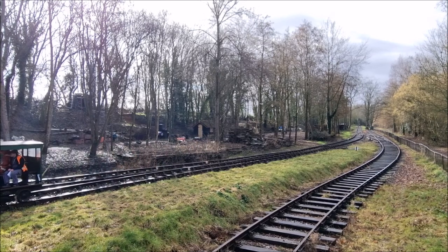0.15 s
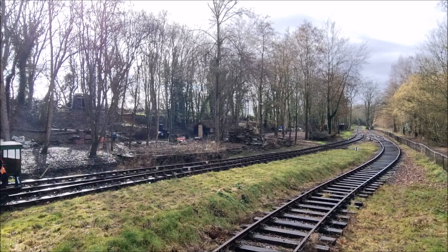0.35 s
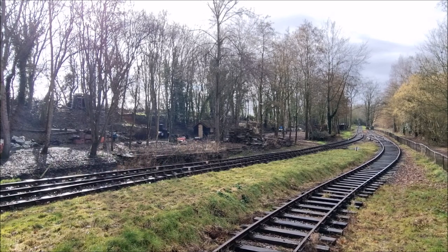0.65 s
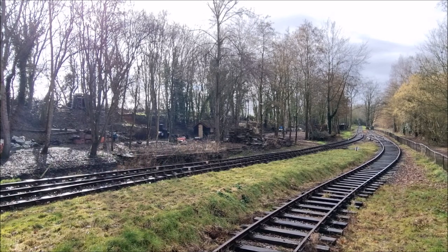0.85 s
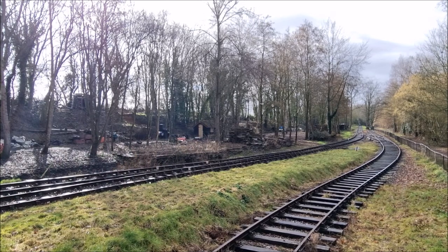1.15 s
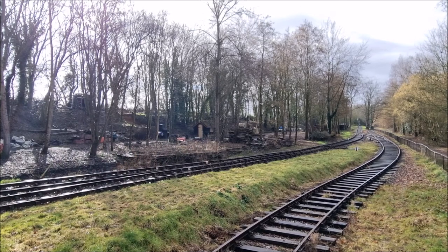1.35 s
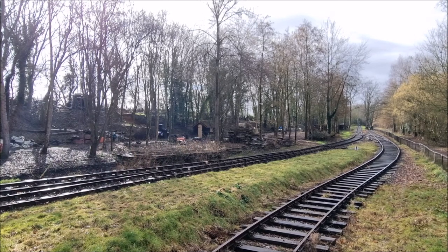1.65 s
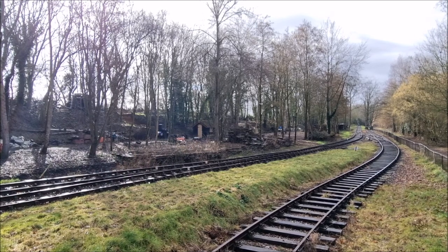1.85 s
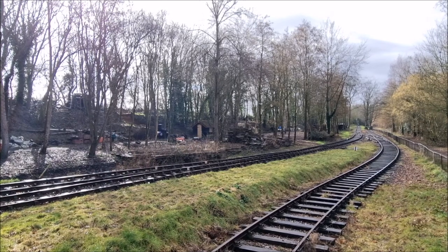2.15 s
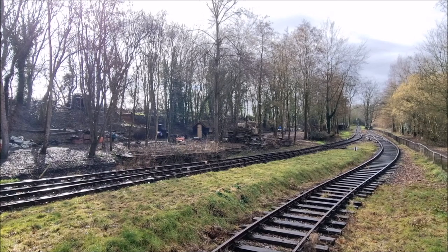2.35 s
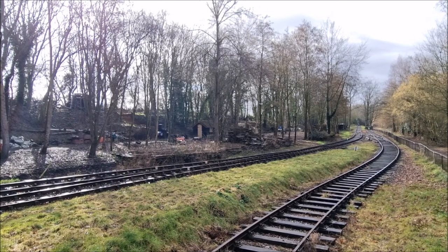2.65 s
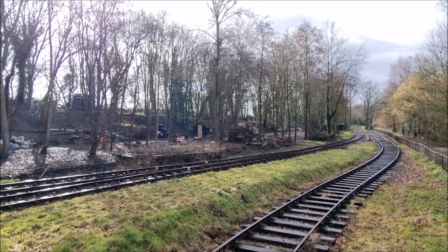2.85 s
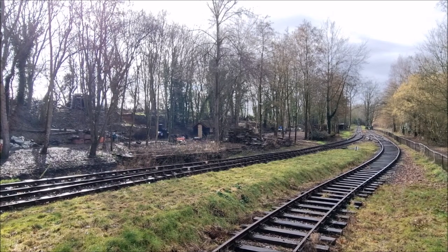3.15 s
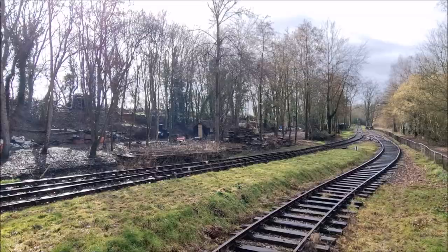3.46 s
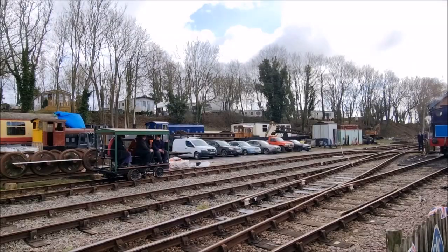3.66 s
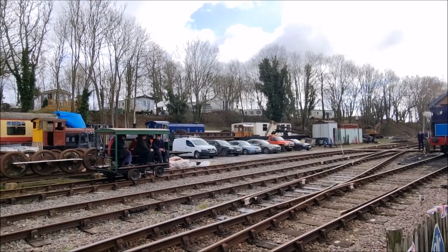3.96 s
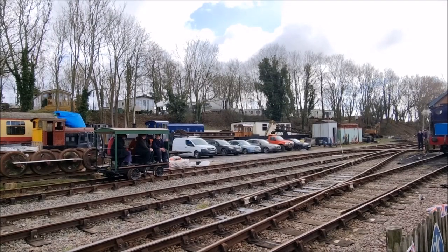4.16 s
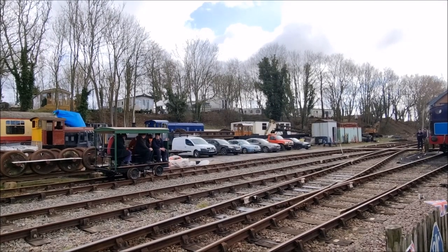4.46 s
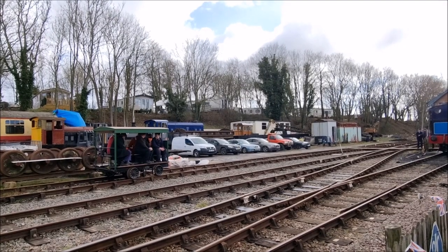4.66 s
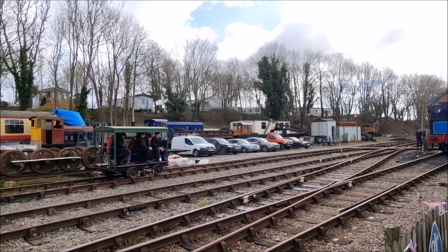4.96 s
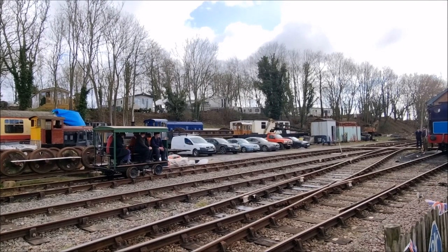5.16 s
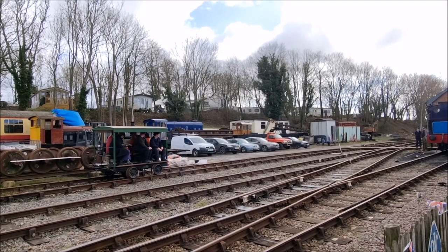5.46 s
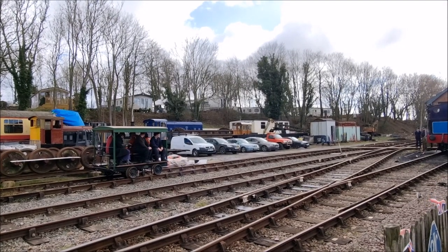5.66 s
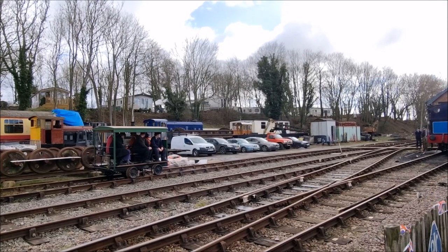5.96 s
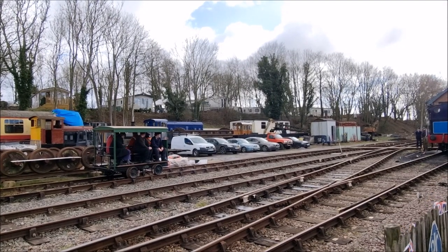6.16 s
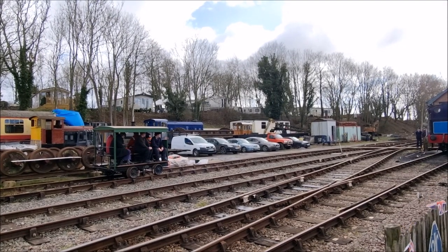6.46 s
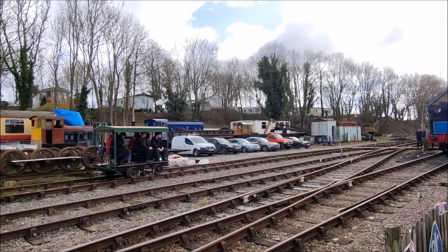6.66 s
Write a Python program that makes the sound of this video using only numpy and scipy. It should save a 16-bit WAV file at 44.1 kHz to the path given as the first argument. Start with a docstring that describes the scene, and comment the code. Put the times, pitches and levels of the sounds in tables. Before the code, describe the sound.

A small rail trolley's two-cylinder engine thuds and bangs as it draws away, then after a brief silence chugs through a yard with whistle chirps.

```python
"""A small rail trolley, twice

Its slow two-cylinder engine thuds and bangs as gas bursts from the exhaust pipes. First it draws away
round a bend, firing evenly, and a small bird calls. After a short silence it pulls through a yard, where
the rear cylinder mostly fires every other cycle and an exhaust whistle chirps for half a second.
Wheels rumble and a breeze touches the microphone."""
import sys
import numpy as np
from scipy import signal
from scipy.fft import rfft, irfft, next_fast_len
from scipy.io import wavfile
from scipy.ndimage import uniform_filter1d

SR = 44100
rng = np.random.default_rng(int(sys.argv[2]) if len(sys.argv) > 2 else 0)


def to_wav(sig):
    """Store sig (one row per channel, or 1-D mono) as 16-bit WAV at the path in sys.argv[1].

    Samples outside -1..1 are clipped; the rate is SR.
    """
    pcm = np.clip(np.atleast_2d(sig), -1, 1) * 32767
    pcm = np.round(pcm).astype(np.int16)
    wavfile.write(sys.argv[1], SR, pcm.T)  # frames by channels


N = 300317
T = np.arange(N) / SR

# Engine speed: time_s, cycles_per_s
BEND_SPEED = [(0, 16.602), (2, 16.742), (2.5, 17.109), (3.6, 16.779)]
YARD_SPEED = [(3.6, 12.641), (4.1, 13.616), (4.7, 14.416), (5.4, 15.169), (6.85, 15.779)]
# How hard each cylinder thuds: time_s, front_db, rear_db
BEND_THUDS = [(0, -7, -0.5), (.8, -4.5, -0.5), (1.5, -7.5, 0), (2.3, -7.5, -2), (3.05, -4, 2),
              (3.53, -2, 0)]
YARD_THUDS = [(3.69, -8.5, -10), (3.82, -0.5, 0), (3.92, -21, -23), (4.2, -8, -25.5), (4.45, -9.5, -8.5),
              (4.62, -15.5, -26), (4.8, -6, -11.5), (5.0, -6, -4.5), (5.25, -2, -6.5), (5.5, -11, -6),
              (5.85, -7.5, -4), (6.15, -7.5, -5.5), (6.5, -14, -8), (6.81, -11.5, -4.5)]
# Notes of the exhaust pipes: pitch_hz, level_db, fade_s (a fade is the time to drop 60 dB)
BEND_FRONT_PIPE = [(101.5, 3, 0.088), (178.2, -9, 0.085), (131, -5, 0.095)]
BEND_REAR_PIPE = [(90.2, 0, 0.07), (125, -14, 0.035), (188, -11.5, 0.066)]
YARD_FRONT_PIPE = [(114.3, 6.5, 0.1), (79.2, -2.5, 0.16), (181.5, -14, 0.24)]
YARD_REAR_PIPE = [(88.2, 3.5, 0.096), (118, -7.5, 0.052), (180.5, -4, 0.025)]
# The rear cylinder's loudest bangs: start_s, level_db, pitch_hz
LOUD_BANGS = [(.026, -16, 3690), (.147, -16.5, 2690), (.207, -16.5, 2360), (.267, -17.5, 1250),
              (.387, -14.5, 2710), (.568, -11, 2670), (.689, -16, 2510), (.748, -18.5, 2880),
              (.809, -18.5, 1230), (1.049, -17.5, 1210), (1.228, -19, 1830), (1.348, -19, 2980),
              (3.81, -17, 2700), (3.887, -20.5, 1780), (3.961, -20.5, 1950), (4.036, -20.5, 1980),
              (4.11, -25, 1940), (4.611, -16, 1910), (4.75, -16, 2660), (4.887, -14.5, 1850),
              (5.024, -12.5, 1980), (5.159, -12, 1338), (5.291, -13, 1830), (5.687, -14.5, 1765),
              (5.947, -17, 2050), (6.077, -18, 2750), (6.206, -17, 1880), (6.591, -16, 1330),
              (6.718, -13, 1780)]
# Rings of the pipe mouth: pitch_hz
MOUTH_HZ = [1373, 1843, 1980, 2833]
# Whistle chirps, stray ones on the bend and a run in the yard: time_s, level_db, pitch_hz
BEND_CHIRPS = [(0.003, -22, 890), (0.113, -19, 916), (0.239, -17, 960)]
YARD_CHIRP_CURVE = [(5.454, -10.5, 948), (5.53, -9.5, 1020), (5.66, -10, 958), (5.79, -8, 1060),
                    (5.91, -12.5, 968), (5.975, -19, 913)]
# The tone of each noise, from low to high: frequency_hz, level_db
SPIT_TONE = [(400, -29), (1000, -1.5), (2000, 5), (3500, -1.5), (5000, -11.5), (9000, -23), (15000, -11)]  # the noise in a bang
BEND_GAS_TONE = [(590, 0), (1000, 5.5), (1640, -5.5), (2820, -4), (4080, -9.5), (4370, -10.5),
                 (7010, -11.5), (8430, -19), (9350, -19), (11100, -22.5), (13100, -16), (15700, -26)]
YARD_GAS_TONE = [(880, -41), (1500, -3.5), (1830, -3), (2360, -6.5), (2550, -8.5), (2760, -6.5),
                 (3560, -10), (4970, -10), (9240, -18), (11100, -21.5), (13000, -18), (15700, -24)]
BEND_WHEEL_TONE = [(18, -52), (30, -46.5), (59, -7), (91, -13), (292, -10.5), (415, -21.5), (1070, -22),
                   (1190, -19.5), (1460, -24), (2500, -30), (3250, -75), (5500, -120)]
YARD_WHEEL_TONE = [(18, -44), (30, -29.5), (75, -2), (129, -1), (250, -19.5), (323, -14.5), (475, -18.5),
                   (1380, -21), (1640, -39), (1830, -28.5), (2260, -38.5), (5000, -40), (6500, -66),
                   (11000, -120)]
RASP_TONE = [(120, -41), (200, -10.5), (280, 1), (400, -2.5), (480, -19.5), (700, -51.5)]
AIR_TONE = [(290, 1), (500, -12.5), (621, 3), (707, -4), (1060, -3), (2990, -10.5), (3500, -12.5),
            (6420, -17), (11400, -33.5), (12800, -27.5), (15700, -37)]  # steady background
WIND_TONE = [(15, -18), (25, -7), (45, -4), (80, -22), (150, -55)]
PLATE_TONE = [(1100, -37), (1400, -2.5), (1560, -26), (1800, -4), (1950, -16), (2300, -43)]
JET_TONE = [(2000, -30), (4500, -2.5), (6000, -2.5), (9000, -2), (11500, -6.5), (13500, 0), (15700, -9)]
# How alike a noise is on the left and right: frequency_hz, likeness (1 is the same)
STEREO_LIKENESS = [(40, 0.92), (120, 0.81), (300, 0.27), (1000, 1), (3000, 0.31), (8000, 0.068),
                   (15000, 0.23)]
# Treble fading with distance on the bend: time_s, treble_db
RECEDING = [(0, 1.5), (.6, -0.5), (1.2, -7.5), (2.06, -19.5), (2.7, -28), (3.53, -30)]
# Strength of the pipe rasp and of the breeze: time_s, level_db
RASP_LEVEL = [(0, -36.5), (1.6, -31), (2.3, -34.5), (3.0, -32), (3.3, -33), (3.53, -33)]
WIND_LEVEL = [(0, -49.5), (2, -34.5), (4.3, -46), (5.0, -33.5), (5.7, -29.5), (6.81, -45)]
# Gas and wheel noise in the yard: time_s, hiss_db, rolling_db
YARD_NOISE = [(3.69, -36.5, -23.5), (3.9, -33, -23.5), (5, -33.5, -22), (5.8, -36, -24), (6.81, -35, -24)]
# How long trackside echoes last: frequency_hz, fade_s
ECHO_FADE = [(100, 0.15), (1000, 0.11), (8000, 0.077)]
# How far the left channel is ahead of the right: frequency_hz, lead_radians
BEND_LEAD = [(0, 0), (100, .4), (300, 1.2), (780, 2.4), (1810, 3.3), (16000, 32)]
YARD_LEAD = [(0, 0), (100, .45), (430, 1.6), (1120, 1.5), (2500, 2.1), (16000, 10.5)]
# Bird calls: start_s, length_s, from_hz, to_hz, level_db
BIRD_CALLS = [(3.26, .07, 7200, 7130, -56), (3.426, 0.095, 7140, 7000, -48)]
# Wheels hitting rail joints, heard only once the yard begins: start_s, level_db, pitch_hz
JOINT_KNOCKS = [(2.9, -6, 56), (4.562, -6, 350), (4.583, -4.5, 610)]

BEND_END_S, YARD_START_S = 3.5325, 3.6855
BEND_ZERO_S, YARD_ZERO_S = .0283, 3.7327  # the rear firing that counts as cycle 0


def amp(db):
    """Turn decibels into a gain."""
    return 10 ** (np.asarray(db) / 20)


def unit(x):
    """Scale a sound to an average power of 1."""
    return x / np.sqrt(np.mean(x ** 2) + 1e-20)


def at_pitch(points, hz):
    """Read between the rows of a frequency table, on a log scale."""
    known_hz, values = np.transpose(points)
    return np.interp(np.log(hz + 1), np.log(known_hz + 1), values)


def at_time(rows, times):
    """Read between the rows of a time table, giving one curve for each value column."""
    known_s, *columns = np.transpose(rows)
    return [np.interp(times, known_s, column) for column in columns]


def filtered(x, response):
    """Multiply each frequency in a sound by response(hz)."""
    size = next_fast_len(N + SR // 2)
    return irfft(rfft(x, size) * response(np.fft.rfftfreq(size, 1 / SR)), size)[..., :N]


def noise(tone, patchy_db):
    """Stereo noise of a given tone, with random louder and softer patches."""
    grid = signal.stft(rng.standard_normal((2, N + 512)), nperseg=512)[2]
    patches = uniform_filter1d(uniform_filter1d(rng.standard_normal(grid.shape[1:]), 5, 0), 8, 1)
    pair = signal.istft(grid * amp(patchy_db * unit(patches)), nperseg=512)[1][:, :N]

    def tone_and_width(hz):
        angle = np.arccos(np.clip(at_pitch(STEREO_LIKENESS, hz), -1, 1)) / 2
        return amp(at_pitch(tone, hz)) * [np.cos(angle), np.sin(angle)]

    middle, side = filtered(pair, tone_and_width)
    return unit(np.array([middle + side, middle - side]))


def repeat(times, gains, shape):
    """Place one copy of a shape at each time."""
    inside = (times >= 0) & (times * SR < N - 1)
    clicks = np.bincount((times[inside] * SR).astype(int), gains[inside], N)
    return signal.fftconvolve(clicks, shape)[:N]


def cycle_times(cycles, speed, zero_s):
    """When the engine has turned through the given cycles."""
    turned = np.cumsum(at_time(speed, T)[0]) / SR
    return np.interp(cycles, turned - turned[round(zero_s * SR)], T, left=-1, right=T[-1] + 1)


def whistle(chirps, answer_hz=960):
    """Exhaust gas blows a whistle: each rising chirp has two fainter after-notes at answer_hz."""
    out, t = np.zeros(N + SR), T[:SR // 30]
    for start_s, db, hz in chirps:
        notes = [(0, .5, .98 * hz, 3, .025), (.026, -7, answer_hz, 3, .024),
                 (.051, -15, answer_hz, 11, .014)]
        for delay_s, note_db, pitch_hz, glide, length_s in notes:
            turns = pitch_hz * (t + glide * t * t / 2) + rng.random()
            tone = np.sin(2 * np.pi * turns) + amp(-20) * np.sin(4 * np.pi * turns)
            flutter = 1 + .42 * np.sin(2 * np.pi * (t * (70 + 70 * rng.random()) + rng.random()))
            swell = np.sin(np.pi * np.clip(t / length_s, 0, 1) ** .67) ** .77
            out[round((start_s + delay_s) * SR):][:len(t)] += amp(db + note_db) * swell * flutter * tone
    return np.pad(out[130:N], (0, 130))  # each chirp starts to swell 3 ms early


def pipe_thuds(times, db, notes, rise_s):
    """Each firing makes an exhaust pipe ring, starting with a soft dip in pressure."""
    t = T[:SR // 4]
    ring = sum(amp(level - 60 * t / fade_s) * np.sin(2 * np.pi * hz * t) for hz, level, fade_s in notes)
    return repeat(times, amp(db), -ring * (1 - np.exp(-t / rise_s)) ** 2)


def with_loud_bangs(times, db, hz):
    """Give a firing the level and pitch of a listed loud bang within 10 ms of it."""
    db, hz = db.copy(), hz.copy()
    for start_s, level, pitch in LOUD_BANGS:
        nearest = np.argmin(abs(times - start_s))
        if abs(times[nearest] - start_s) < .01:
            db[nearest], hz[nearest] = level, pitch
    return db, hz


def pipe_bangs(times, db, hz, peak_s):
    """Sharp bangs at the pipe mouth: a spit of noise, one main pitch and the mouth's fainter rings."""
    out, t = np.zeros(N + SR), T[:SR // 40]
    spit = unit(filtered(rng.standard_normal(N), lambda f: amp(at_pitch(SPIT_TONE, f))))
    swell = (t / peak_s * np.exp(1 - t / peak_s)) ** 2
    for start_s, level, pitch, phase in zip(times, db, hz, rng.random(len(times))):
        at = round(start_s * SR)
        tone = np.sin(2 * np.pi * (pitch * t + phase))
        rings = np.sin(2 * np.pi * (np.outer(t, MOUTH_HZ) + rng.random(len(MOUTH_HZ)))).sum(axis=1)
        burst = np.take(spit, at + np.arange(len(t)), mode="wrap")
        out[at:][:len(t)] += amp(level) * swell * (tone + .3 * rings + 1.2 * burst)
    return out[:N]


def puffs(times, gains, rise_s, fade_s):
    """How the flow of gas swells and dies each time a valve opens."""
    t = T[:SR // 4]
    return repeat(times, gains, amp(-60 * t / fade_s) * (1 - np.exp(-t / rise_s)))


def gas_hiss(db, flow, tone, patchy_db):
    """Escaping gas hisses in step with its flow."""
    return amp(db) * unit(flow * noise(tone, patchy_db))


def wheel_rumble(db, shake, tone, patchy_db):
    """Rolling wheels rumble, louder as each firing shakes the frame."""
    return amp(db) * unit(shake * noise(tone, patchy_db))


def pipe_rasp(flow):
    """Gas swirling inside the pipes makes a low rasp."""
    return amp(at_time(RASP_LEVEL, T)[0]) * unit((1 + .61 * flow) * noise(RASP_TONE, patchy_db=3))


def echoes(x, echo_db, block=4096):
    """Add echoes from track stones, trees and wagons; they keep changing as the trolley moves."""
    out = np.zeros((2, N + SR))
    for at in range(0, N, block):
        if x[at:at + block].any():
            hz, t, grid = signal.stft(rng.standard_normal((2, SR // 5)), SR, nperseg=256)
            grid *= amp(-60 * t / at_pitch(ECHO_FADE, hz)[:, None])
            tail = signal.istft(grid, SR, nperseg=256)[1]
            tail /= np.linalg.norm(tail, axis=1, keepdims=True)
            echo = signal.fftconvolve(x[None, at:at + block], tail, axes=1)
            out[:, at:at + echo.shape[1]] += echo
    return x + amp(echo_db) * out[:, :N]


def wind():
    """A light breeze rumbles separately in each of the microphone's two openings."""
    rumble = filtered(rng.standard_normal((2, N)), lambda hz: amp(at_pitch(WIND_TONE, hz)))
    return amp(at_time(WIND_LEVEL, T)[0]) * unit(rumble)


def bird():
    """A small bird gives thin, falling whistles from the trees."""
    out = np.zeros(N)
    for start_s, length_s, from_hz, to_hz, db in BIRD_CALLS:
        progress = np.clip((T - start_s) / length_s, 0, 1)
        hz = from_hz + (to_hz - from_hz) * progress
        out += amp(db) * np.sin(np.pi * progress ** 1.6) * np.sin(2 * np.pi * np.cumsum(hz) / SR)
    return out


def plate_rattle(db, shake):
    """Loose plates in the frame rattle along with the firings."""
    return amp(db) * unit(shake * noise(PLATE_TONE, patchy_db=5))


def joint_knocks():
    """Wheels cross rail joints with dull blows that die within a few vibrations."""
    out, t = np.zeros(N + SR), T[:SR // 10]
    for start_s, db, hz in JOINT_KNOCKS:
        out[round(start_s * SR):][:len(t)] -= amp(db - 8.5 * hz * t) * np.sin(2 * np.pi * hz * t)
    return out[:N]


def whistle_jet(times, db):
    """Gas rushes through the whistle, starting just before each chirp."""
    return puffs(times - .007, amp(db), rise_s=.0093, fade_s=.12) * noise(JET_TONE, patchy_db=.5)


def bend():
    """Both cylinders fire in every cycle; the treble fades as the trolley draws away."""
    cycles = np.arange(60)
    front = cycle_times(cycles - .37, BEND_SPEED, BEND_ZERO_S)
    rear = cycle_times(cycles, BEND_SPEED, BEND_ZERO_S)
    front_luck, rear_luck, bang_luck, pitch_luck = rng.standard_normal((len(rear), 4)).T
    front_db, rear_db = at_time(BEND_THUDS, rear)
    thuds = pipe_thuds(front, front_db + .7 * front_luck, BEND_FRONT_PIPE, rise_s=.0033)
    thuds += pipe_thuds(rear, rear_db + .7 * rear_luck, BEND_REAR_PIPE, rise_s=.0016)
    bang_db = -21.5 + .62 * at_time(RECEDING, rear)[0] + 1.6 * bang_luck
    bang_db, bang_hz = with_loud_bangs(rear, bang_db, 2700 * np.exp(.17 * pitch_luck))
    bangs = pipe_bangs(rear - .0022, bang_db, bang_hz, peak_s=.0013)
    treble_db, = at_time(RECEDING, T)
    puff_gains = amp(3 * np.r_[front_luck, rear_luck])
    flow = .49 + puffs(np.r_[front, rear - .0015], puff_gains, rise_s=.0007, fade_s=.045)
    hiss = gas_hiss(-25.5 + treble_db, flow, BEND_GAS_TONE, patchy_db=1.5)
    rolling = wheel_rumble(-25 + .37 * treble_db, 1 + .5 * flow, BEND_WHEEL_TONE, patchy_db=3)
    rasp = pipe_rasp(flow)
    # Distance and the bank beside the line dull the bangs and thuds.
    bangs = filtered(bangs, lambda hz: 1 / (1 + 1j * hz / 9000))
    muffled = amp(-1.5) * filtered(thuds, lambda hz: 1 / (1 + (hz / 175) ** 4))
    far = np.clip(T / 4.1, 0, .9)
    exhaust = echoes((1 - far) * thuds + far * muffled, echo_db=-17)
    sharp = echoes(bangs + bird() + whistle(BEND_CHIRPS), echo_db=-13)
    air = amp(-37.5) * noise(AIR_TONE, patchy_db=-1)
    return exhaust + sharp + rasp + hiss + rolling + air


def yard(skip_after=8):
    """The front cylinder fires in every cycle; after cycle skip_after the rear one misses the odd ones."""
    cycles = np.arange(-1, 46)
    rear_cycles = np.r_[0:skip_after, skip_after:cycles[-1]:2]
    front = cycle_times(cycles - .373, YARD_SPEED, YARD_ZERO_S)
    rear = cycle_times(rear_cycles, YARD_SPEED, YARD_ZERO_S)
    front_luck, puff_luck = rng.standard_normal((len(front), 2)).T
    bang_luck, rear_luck = rng.standard_normal((len(rear), 2)).T
    front_db = at_time(YARD_THUDS, front)[0] + 1.6 * front_luck
    rear_db = at_time(YARD_THUDS, rear)[1] + .54 * rear_luck
    thuds = pipe_thuds(front, front_db, YARD_FRONT_PIPE, rise_s=.0049)
    thuds += pipe_thuds(rear + .00091, rear_db, YARD_REAR_PIPE, rise_s=.0016)
    # Fuel that waited a cycle bangs harder, and a harder bang spits more gas.
    bang_db = np.where(rear_cycles > skip_after, -19.5, -27) + 1.6 * bang_luck
    bang_db, bang_hz = with_loud_bangs(rear, bang_db, rng.choice(MOUTH_HZ, len(rear)))
    flow = .47 + puffs(front, amp(1.8 * puff_luck), rise_s=.0019, fade_s=.1)
    flow += puffs(rear, amp(.83 * (bang_db + 22.5)), rise_s=.0015, fade_s=.08)
    chirp_s = cycle_times(np.arange(24, 33) + .44, YARD_SPEED, YARD_ZERO_S)  # one chirp a cycle
    chirp_db, chirp_hz = at_time(YARD_CHIRP_CURVE, chirp_s)
    hiss_db, rolling_db = at_time(YARD_NOISE, T)
    hiss = gas_hiss(hiss_db, flow, YARD_GAS_TONE, patchy_db=2) + whistle_jet(chirp_s, chirp_db - 13)
    shake = 1 + 1.14 * flow
    rolling = wheel_rumble(rolling_db, shake, YARD_WHEEL_TONE, patchy_db=1.5)
    rattle = plate_rattle(rolling_db - 18, shake)
    bangs = pipe_bangs(rear - .0005, bang_db, bang_hz, peak_s=.0021)
    chirps = echoes(whistle(zip(chirp_s, chirp_db, chirp_hz)), echo_db=-13)
    chirps *= amp([[1.5], [-1.5]])  # a little to the left
    return echoes(thuds + bangs + joint_knocks(), echo_db=-14.5) + chirps + hiss + rolling + rattle


def microphone(x, lead):
    """Sound reaches the left opening first; both sides lose the deepest bass."""
    def response(hz):
        radians = np.interp(hz, *np.transpose(lead))
        return np.exp(np.outer([.5j, -.5j], radians)) * hz ** 2 / (hz ** 2 + 46 ** 2)

    return filtered(x, response)


def scene():
    """The bend stops dead; after a short silence the yard fades in quickly."""
    bend_on = T < BEND_END_S
    yard_on = np.clip((T - YARD_START_S) / .0087, 0, 1)
    on_bend = microphone(bend(), BEND_LEAD) * bend_on
    in_yard = microphone(yard(), YARD_LEAD) * yard_on * amp([[.3], [-.3]])
    return on_bend + in_yard + wind() * (bend_on + yard_on)


def record(dry):
    """Round off the highest peaks and keep nothing above 16 kHz."""
    soft = dry / (1 + np.abs(dry) ** 8) ** (1 / 8)
    return filtered(soft, lambda hz: hz < 16000)


dry = scene()
out = record(dry)
to_wav(out)
```